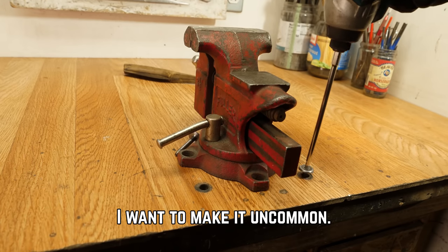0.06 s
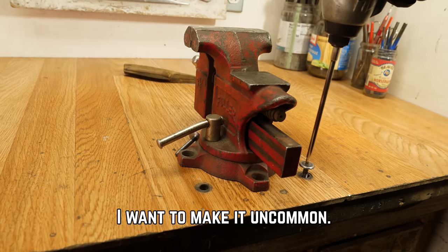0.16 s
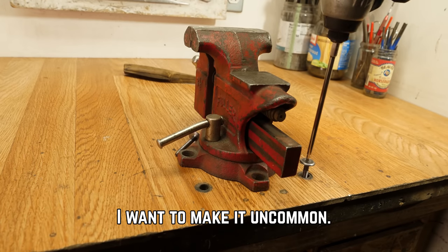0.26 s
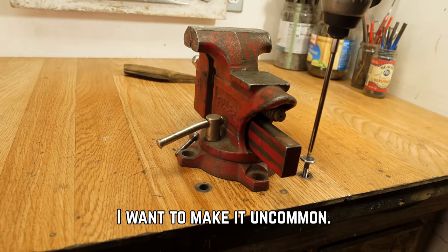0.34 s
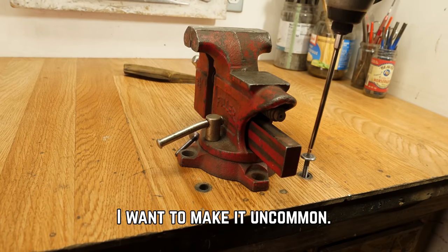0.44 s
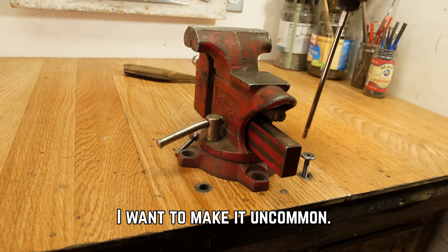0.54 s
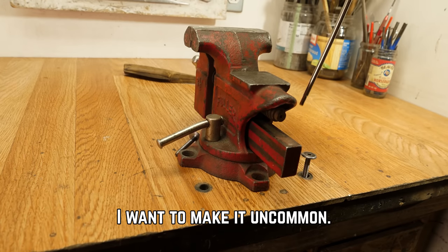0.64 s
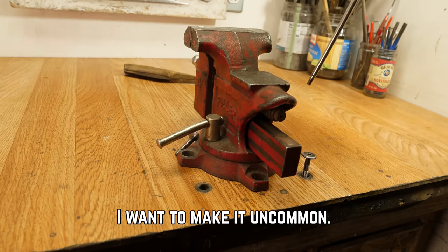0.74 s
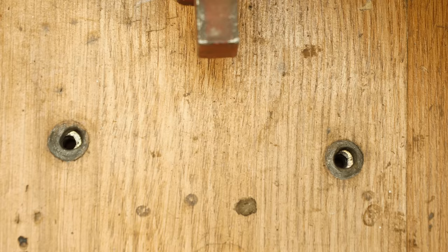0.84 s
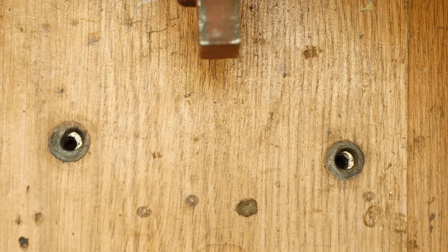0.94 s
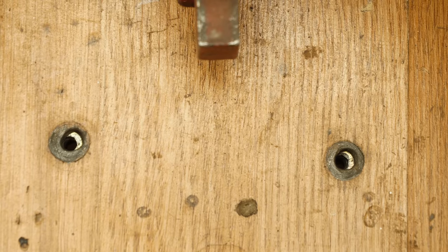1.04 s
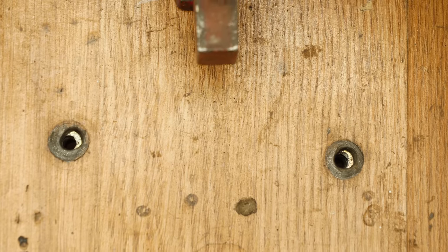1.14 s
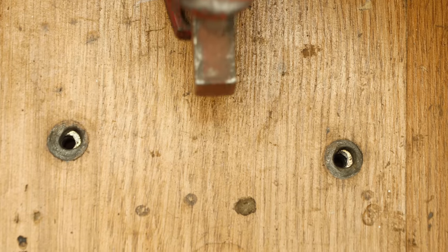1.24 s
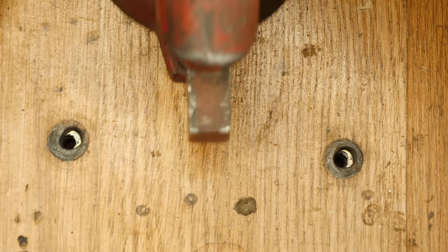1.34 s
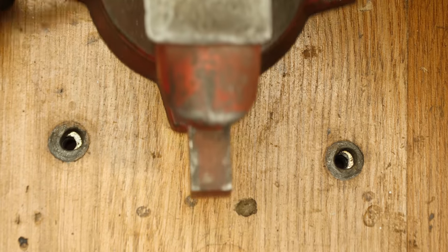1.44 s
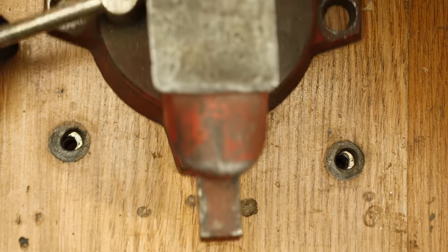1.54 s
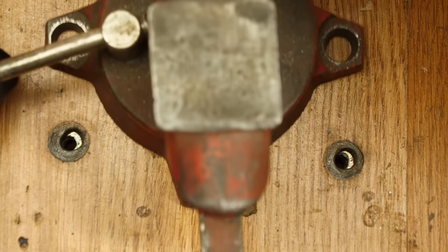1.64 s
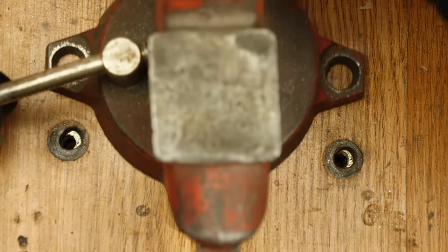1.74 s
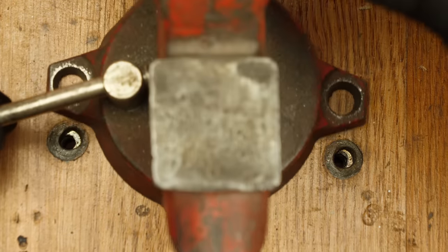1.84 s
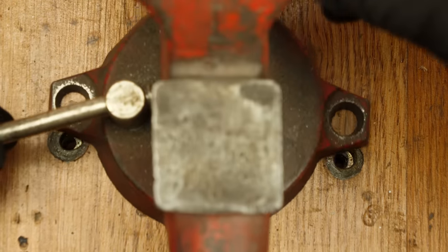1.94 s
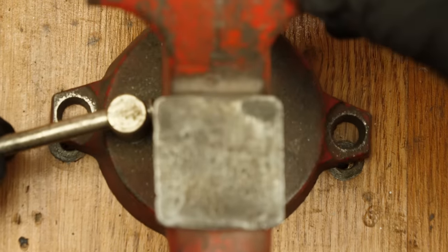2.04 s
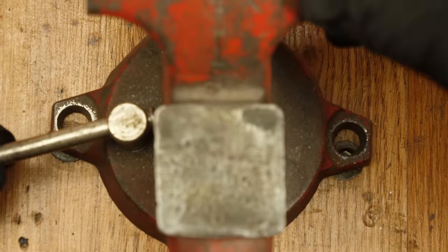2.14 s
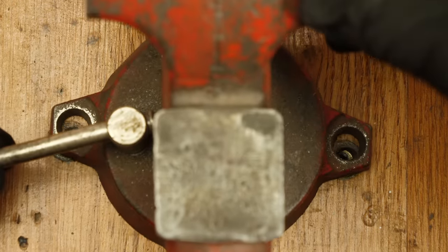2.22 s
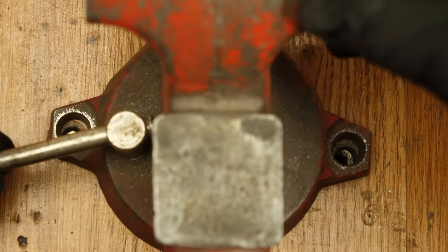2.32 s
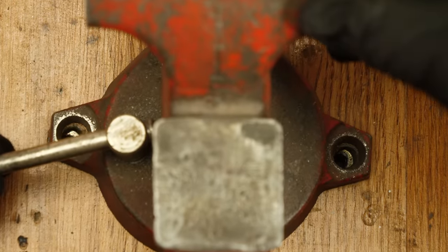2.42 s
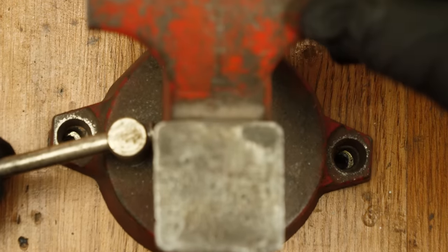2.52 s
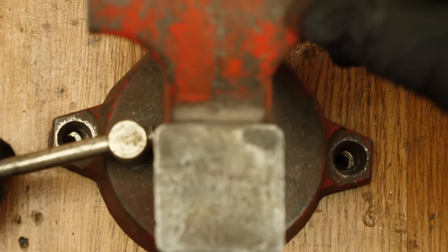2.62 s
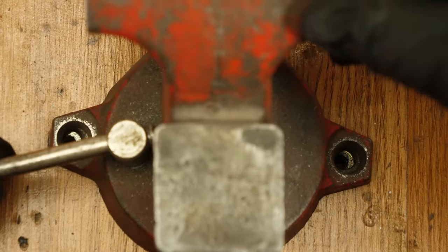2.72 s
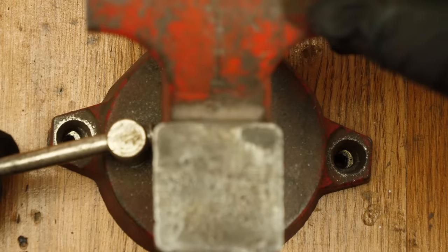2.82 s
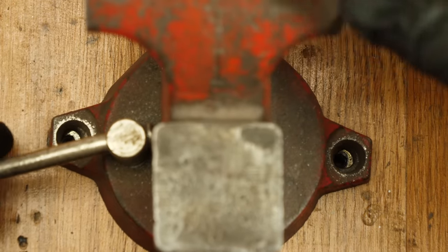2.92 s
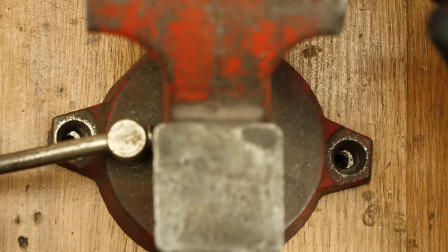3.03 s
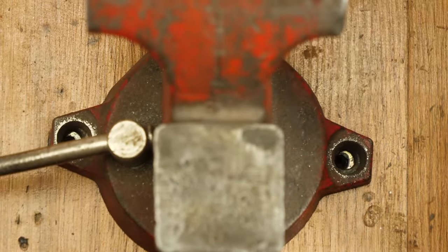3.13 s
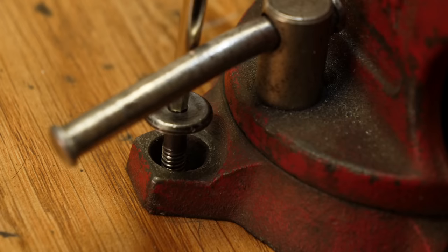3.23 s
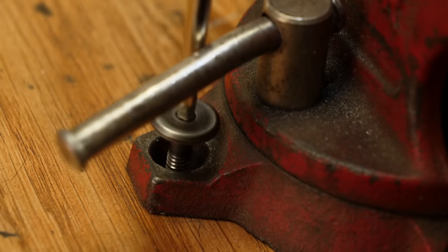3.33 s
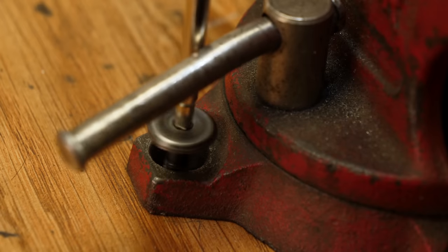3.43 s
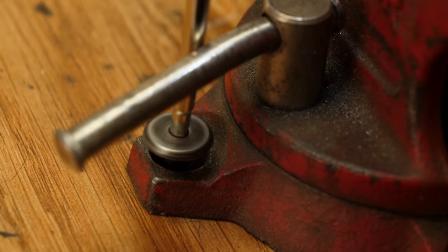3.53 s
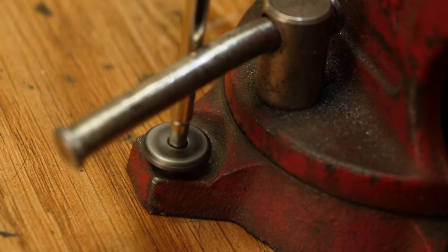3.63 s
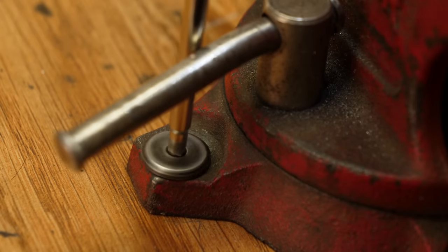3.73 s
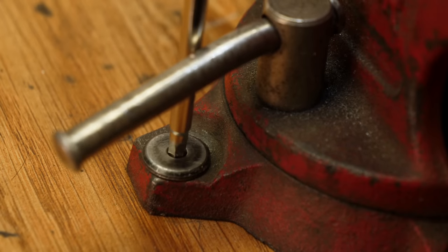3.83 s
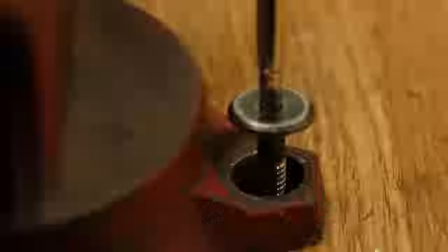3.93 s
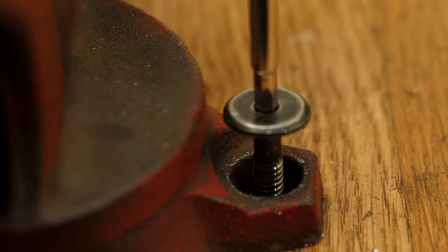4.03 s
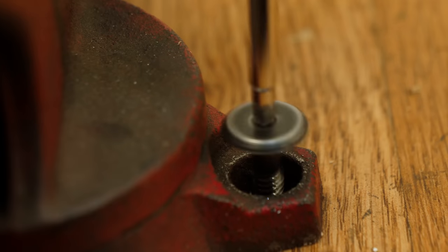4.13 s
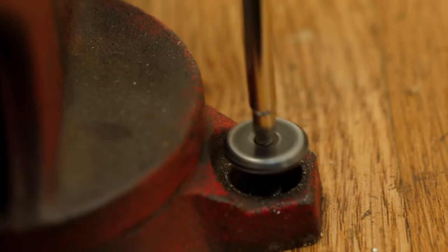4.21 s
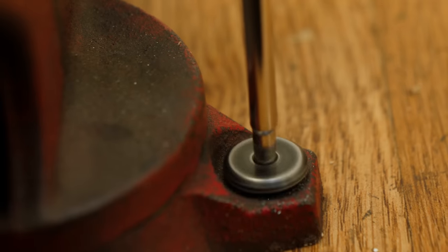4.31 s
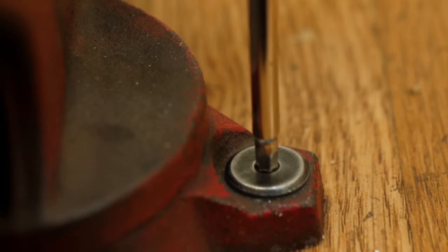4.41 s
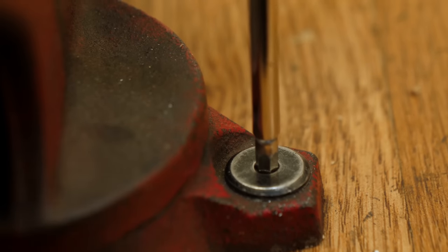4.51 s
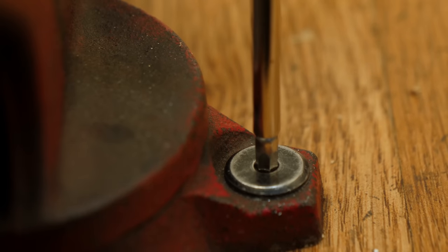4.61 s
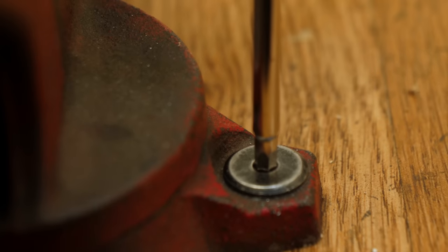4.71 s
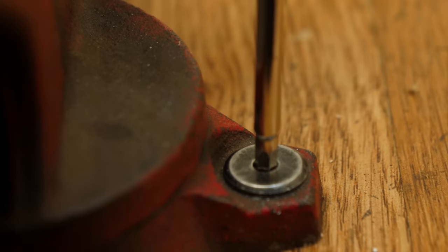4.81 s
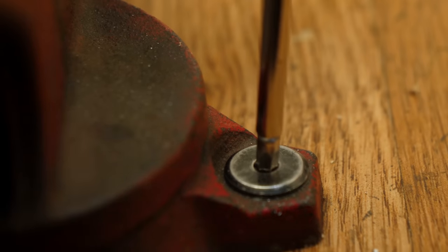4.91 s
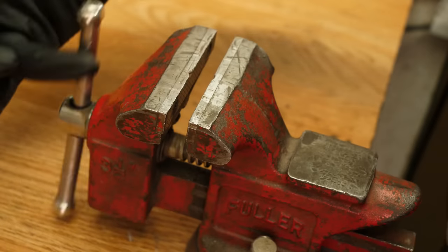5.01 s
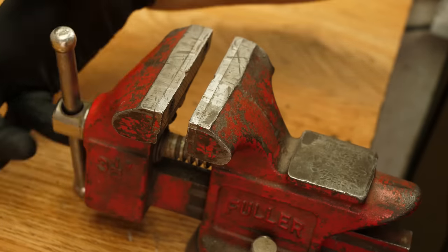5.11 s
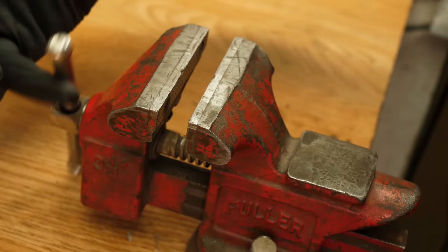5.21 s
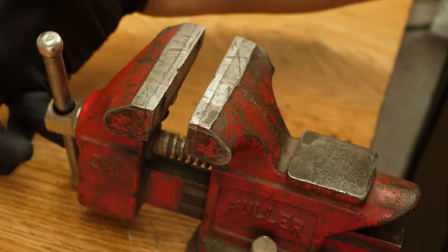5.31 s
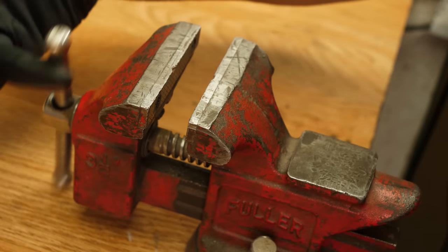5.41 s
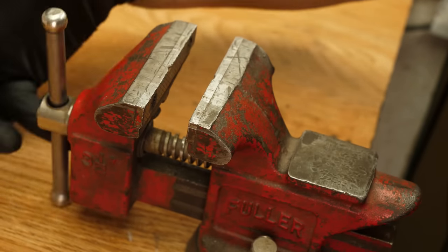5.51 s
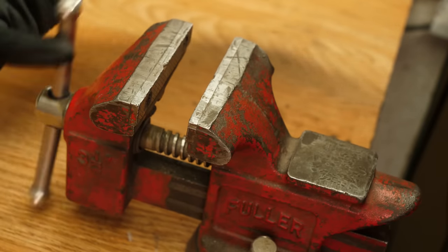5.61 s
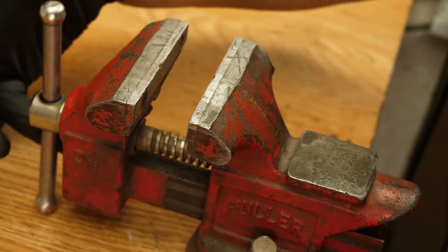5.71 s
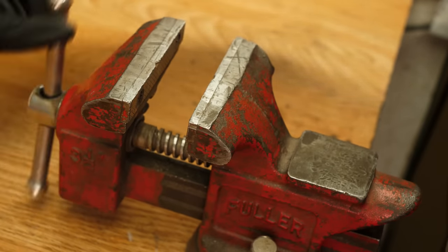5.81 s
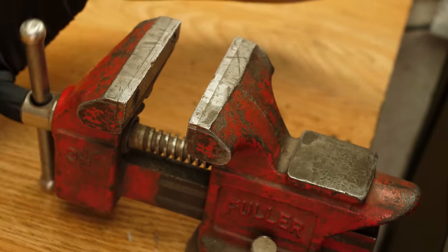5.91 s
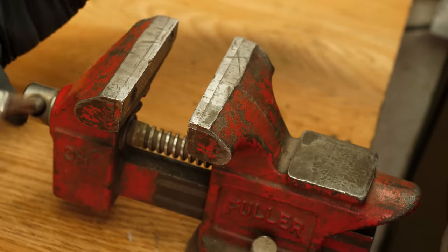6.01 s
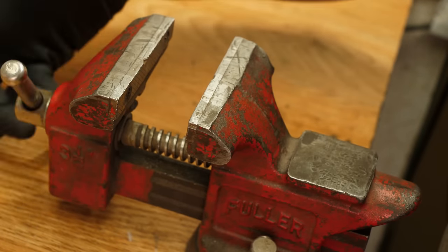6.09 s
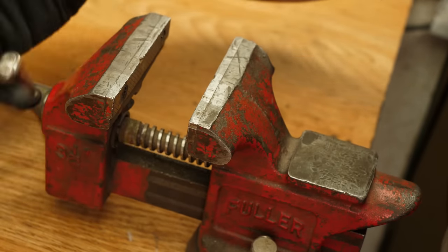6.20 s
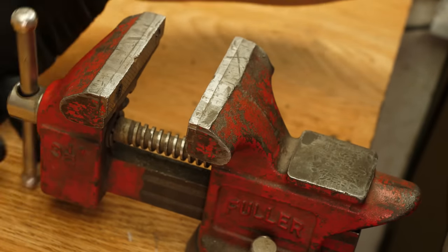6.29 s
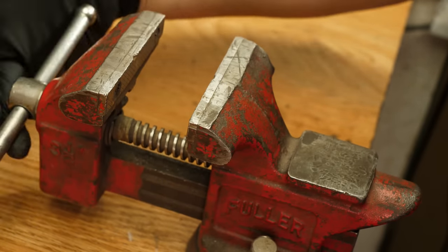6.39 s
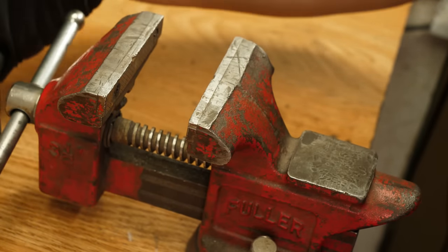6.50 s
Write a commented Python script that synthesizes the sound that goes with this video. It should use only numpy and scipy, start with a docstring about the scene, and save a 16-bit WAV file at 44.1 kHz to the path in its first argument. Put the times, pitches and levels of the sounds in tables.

```python
"""Workbench with an impact driver and a vise

Close by, an impact driver backs a bolt out; a cast-iron vise is dragged over the wooden top and set down.
Two bolts are driven until the hammer chatters, then the vise handle is cranked and clanks in its loose socket.
Rubbing and grinding are rough noise in three bands, hits are noise ringing a set of resonances, and whines
and hums are gliding sines. The actions are set apart by silence; a small room answers the metal hits."""
import sys
import numpy as np
from scipy import signal
from scipy.fft import rfft, irfft, next_fast_len
from scipy.io import wavfile
from scipy.ndimage import uniform_filter1d, map_coordinates

SR = 44100
rng = np.random.default_rng(int(sys.argv[2]) if len(sys.argv) > 2 else 0)


def wav_out(sig):
    """Save sig, one row per channel (or a flat mono array), as 16-bit PCM at SR to the path in sys.argv[1]."""
    wavfile.write(sys.argv[1], SR, np.round(np.clip(np.atleast_2d(sig).T, -1, 1) * 32767).astype(np.int16))


N = 288855
TIME = np.arange(N) / SR  # [s]

# Deep hum, one curve per stretch of action: (time [s], level [dB])
SWAY_CURVES = [
    [(0, -49), (0.42, -65.5), (0.55, -57), (0.8, -93)],
    [(0.97, -63), (1.18, -48), (1.3, -56), (1.7, -42.5), (2.0, -48.5), (2.65, -47), (2.8, -61.5),
     (2.92, -51.5), (3.05, -58), (3.2, -95)],
    [(3.33, -60.5), (3.5, -53.5), (3.88, -45.5), (3.99, -57.5)],
    [(4.1, -71.5), (4.33, -55.5), (4.85, -60), (5.0, -81)],
]
# How long the room rings at each pitch: (frequency [Hz], time to fall 60 dB [s])
ROOM_DECAY = [(200, 0.059), (2000, 0.11), (10000, 0.054)]

# Dull knocks on the bench: (time [s], strength [dB], brightness [dB], nominal time to fall 60 dB [s])
KNOCK_EVENTS = [(0.989, -44.5, -24, .06), (1.092, -36, 0, 0.16), (1.124, -28, -16.5, 0.11),
                (2.285, -40, -22, 0.089), (2.62, -55, -20, .1), (2.856, -40, -32, .11),
                (2.92, -57, -28, 0.11), (2.99, -51, -18.5, .07), (3.012, -36, -12, 0.1),
                (3.358, -37, -7.5, 0.23), (3.417, -25.5, -10.5, .1), (3.677, -33.5, -10.5, 0.094),
                (4.861, -42.5, -0.5, 0.16)]
# Resonances of the bench top: (frequency [Hz], width [Hz], level [dB])
BENCH_TOP_MODES = [(85.6, 21, 0.5), (166, 152, -1.5), (287, 100, 1), (476, 150, -4.5)]
# Resonances of a harder contact with the bench: (frequency [Hz], width [Hz], level [dB])
HARD_EDGE_MODES = [(660, 110, -2), (860, 130, 0), (1200, 300, -12), (1900, 600, -20), (3000, 300, -17)]

# The vise dragged over wood, then settling: (time [s], grind level [dB])
DRAG_CURVES = [
    [(0.972, -68), (1.0, -68), (1.08, -75.5), (1.17, -63.5), (1.23, -46.5), (1.29, -43), (1.42, -39.5),
     (1.48, -38), (1.52, -42), (1.83, -45), (1.9, -48), (2.04, -52.5), (2.11, -60.5), (2.28, -59.5),
     (2.36, -56), (2.44, -62.5), (2.68, -69), (2.74, -85), (2.85, -92)],
    [(2.855, -89), (2.93, -84), (2.99, -86), (3.04, -73), (3.1, -85), (3.232, -106)],
]
# Tone colour of iron on wood: (frequency [Hz], relative level per hertz [dB])
WOOD_COLOUR = [(29, -38), (50, -8), (108, -7.5), (148, 2.5), (277, -3.5), (329, 1), (694, -14), (746, -12),
               (1020, -14), (1150, -10.5), (1620, -16.5), (2210, -22), (5950, -17), (14200, -38),
               (16000, -37)]
# Loose parts that sing faintly along with the drag: (frequency [Hz], width [Hz], level [dB])
RATTLE_MODES = [(3890, 100, -4.5), (5560, 120, 2), (2205, 29, 2)]

# Drops of the small lever: (time [s], strength [dB])
LEVER_DROPS = [(2.9984, -27.5), (3.012, -20)]
# Resonances of the lever: (frequency [Hz], width [Hz], level [dB])
LEVER_MODES = [(1500, 400, -10), (3130, 120, -1), (4170, 250, -2), (4400, 150, -5), (4950, 150, -6),
               (5420, 60, 4), (6800, 300, -7), (7430, 250, -9), (9000, 1800, -14), (12400, 1500, -21)]

# Handle and screw contacts: (time [s], strength [dB], steel over strength [dB], squeal over strength [dB])
CLANK_EVENTS = [(5.038, -67, -6, -23), (5.138, -14.5, -17, -38), (5.168, -36, -10, -0.5),
                (5.184, -36, -17, -31), (5.266, -56, -4.5, -5), (5.28, -40.5, -10, -13),
                (5.309, -43.5, -23, -38), (5.347, -24.5, -19, -46), (5.377, -29.5, -16, -37),
                (5.402, -57, -12, -25), (5.505, -41, -20, -40), (5.548, -26, -19.5, -27),
                (5.579, -46, -16, -39), (5.659, -55, -5, -6), (5.676, -45.5, -6, -1.5),
                (5.731, -16, -14.5, -18.5), (5.758, -33.5, -8.5, -1.5), (5.828, -51, -1.5, -4),
                (5.855, -54, 0, -30), (5.871, -35.5, -7.5, -22), (5.924, -13, -14, -35),
                (5.964, -28.5, -16, -37), (6.002, -42.5, -11, -28), (6.046, -34, -2, 2.5),
                (6.083, -38.5, -27, -37), (6.106, -38.5, -9.5, -1), (6.145, -18.5, -12, -21),
                (6.169, -24.5, -41, -45), (6.19, -25.5, -13.5, -45), (6.344, -20.5, -19.5, -19),
                (6.36, -31.5, -9, -9), (6.384, -50, -16, -37.5), (6.403, -46.5, -12, -13),
                (6.432, -40, -27, -38), (6.521, -40, 3.5, -1)]
# Resonances of the vise body: (frequency [Hz], width [Hz], level [dB])
CASTING_MODES = [(54.6, 38, -15), (152, 33.4, -3), (348.4, 43, 3), (566, 80, -4), (633, 85, -6.5),
                 (770, 146, -10)]
# Resonances of the jaw: (frequency [Hz], width [Hz], level [dB])
JAW_MODES = [(942, 38, 0.5), (1240, 101, 0), (1465, 255, -7.5), (1790, 130, -10), (2005, 120, -11.5)]
# Resonances of the handle bar: (frequency [Hz], width [Hz], level [dB])
HANDLE_BAR_MODES = [(2404, 190, -2), (2840, 220, -3), (3470, 200, -7), (4110, 130, -0.5), (4660, 220, -8.5),
                    (5420, 180, -1.5), (4380, 2900, -11.5), (8900, 3000, -22.5)]
# Resonances of the screw: (frequency [Hz], width [Hz], level [dB])
SCREW_MODES = [(5700, 140, -3), (6545, 130, -0.5)]
# Resonances of the squeal: (frequency [Hz], width [Hz], level [dB])
SQUEAL_MODES = [(10870, 390, 12), (11500, 180, 4), (11400, 330, -14), (14200, 630, -16)]

# Bit ticking in the bolt head, and grit under the vise: (time [s], strength [dB])
TICK_EVENTS = [(0.0164, -36), (0.3069, -15), (0.3178, -27), (0.3835, -19), (0.3972, -20.5), (0.4744, -27.5),
               (0.512, -24), (0.5472, -29.5), (0.6058, -34), (0.637, -19.5), (0.6622, -27), (1.862, -38),
               (1.8863, -22.5), (1.9027, -29), (2.1845, -30.5), (2.337, -51), (2.351, -33), (2.3798, -37),
               (2.441, -38.5), (2.5202, -41.5), (2.5835, -47), (2.7107, -49.5), (3.3275, -21),
               (3.3476, -31), (3.3583, -18), (3.6947, -27), (3.7962, -20.5), (3.8068, -20.5), (4.1027, -20),
               (4.1231, -21), (4.1771, -15.5), (4.1877, -14), (4.216, -17), (4.6603, -19.5), (4.6825, -15),
               (4.7823, -41.5), (4.8198, -45), (4.8605, -28.5), (4.8782, -39.5)]
# Resonances of the thin bit: (frequency [Hz], width [Hz], level [dB])
BIT_MODES = [(4420, 1000, 5.5), (6100, 2500, 2.5), (8900, 730, -2), (13100, 1500, -9)]
# Resonances of the bolt head: (frequency [Hz], width [Hz], level [dB])
BOLT_HEAD_MODES = [(1200, 350, -6.5), (2850, 1200, -3.5)]
# Hammer blows on the anvil: (time [s], strength [dB])
HAMMER_BLOWS = [(3.856, -14.5), (3.866, -12.5), (3.875, -8.5), (3.884, -9), (3.892, -15.5), (4.453, -7.5),
                (4.473, -3), (4.493, -2.5), (4.51, -3), (4.523, -5.5), (4.535, -6.5), (4.543, -8),
                (4.554, -7.5), (4.565, -5.5), (4.576, -6), (4.588, -4), (4.599, -12.5), (4.611, -7),
                (4.617, -2.5), (4.633, -17)]
# Resonances of the anvil: (frequency [Hz], width [Hz], level [dB])
ANVIL_MODES = [(742, 20, 2.5), (1095, 16, 4.5), (1330, 23, 4), (2460, 35, -11.5), (3090, 17, -10),
               (3470, 58, -8.5), (3990, 46, -4), (4530, 170, -6.5), (5550, 180, -8), (5980, 130, -7),
               (7030, 160, -3.5), (7800, 76, -8), (8310, 30, -16.5), (8950, 37, -22)]
# Broad resonances of the hammer's clatter: (frequency [Hz], width [Hz], level [dB])
CLATTER_MODES = [(75.3, 37, -8.5), (513, 350, -5.5), (844, 410, -1), (2450, 5370, -4.5), (5500, 7400, -4.5),
                 (10950, 8700, -15.5)]

# The driver's three runs, the last two split before and after their hammering:
# (time [s], gear level [dB], bench drone level [dB])
DRIVER_RUNS = [
    [(0, -41, -37), (0.04, -47, -44.5), (0.2, -49, -48), (0.42, -50, -54.5), (0.53, -55.5, -69),
     (0.61, -64, -79), (0.66, -56.5, -71), (0.69, -82.5, -78), (0.79, -104, -99)],
    [(3.327, -58, -63), (3.345, -50.5, -65), (3.39, -43, -37), (3.46, -49, -49), (3.76, -46, -48.5),
     (3.825, -48, -46), (3.85, -38, -42.5), (3.87, -36, -29)],
    [(3.9, -44, -32), (3.94, -48, -50), (3.985, -67, -59)],
    [(4.1, -51.5, -64.5), (4.14, -49, -51), (4.24, -44, -40), (4.42, -45, -43.5), (4.44, -37.5, -42.5),
     (4.455, -36, -49)],
    [(4.63, -23.5, -40), (4.705, -40.5, -56.5), (4.75, -59.5, -72), (4.85, -77.5, -66), (4.9, -68, -61),
     (5.02, -104.5, -89.5)],
]
# Fan hiss over the gears, one value per part of the runs: (level [dB])
FAN_HISS = (4, 0.5, -2, 4.5, -3.5)
# Tone colour while the bolt comes out: (frequency [Hz], relative level per hertz [dB])
OUT_COLOUR = [(29, -32.5), (50, 19), (116, 1), (559, -1.5), (1150, -2.5), (1330, 0.5), (2210, -10),
              (2950, -3), (4900, -1), (13200, -13.5), (16000, -23.5)]
# Tone colour of the first bolt going in: (frequency [Hz], relative level per hertz [dB])
FIRST_COLOUR = [(29, -37), (50, -14), (101, -1.5), (128, 8.5), (203, 2), (329, -18.5), (483, -9.5),
                (711, -19), (1020, -3.5), (1360, -12.5), (2270, -17), (2810, -13), (3580, -10.5),
                (7040, -11), (16000, -33)]
# Tone colour of the second bolt going in: (frequency [Hz], relative level per hertz [dB])
SECOND_COLOUR = [(29, -35), (50, 0.5), (155, -0.5), (428, -12.5), (646, -4), (1910, -13.5), (3250, -12),
                 (3760, -12.5), (5020, -9.5), (16000, -30.5)]
# Gear whine while the bolt comes out: (time [s], tooth rate [Hz], level [dB])
OUT_WHINE = [(0, 1385, -50), (.07, 1492, -49.5), (.13, 1550, -48), (.18, 1560, -48), (.24, 1480, -50),
             (.3, 1330, -52), (.375, 1180, -57)]
# Gear whine coasting down: (time [s], tooth rate [Hz], level [dB])
COAST_WHINE = [(.46, 1690, -65), (.54, 1665, -61), (.6, 1590, -58), (.635, 1510, -62)]
# Gear whine of the second bolt going in: (time [s], tooth rate [Hz], level [dB])
IN_WHINE = [(4.22, 1590, -40), (4.29, 1637, -42), (4.44, 1686, -44.5)]
# Gear whine as the gears take up the load: (time [s], tooth rate [Hz], level [dB])
BITE_WHINE = [(4.156, 1310, -49), (4.17, 1266, -38), (4.19, 1400, -60)]
# Lines of the four whines, in the order above: (multiple of tooth rate [1], level [dB])
TOOTH_LINES = [
    [(1, -12.5), (2, -1.5), (3, 0.5), (5, -4)],
    [(2, -20), (3, 2.5)],
    [(1, -12.5), (2, -12.5), (3, -4)],
    [(1, -4.5), (2, -0.5)],
]
# The bolt hums in the bench: (time [s], base rate [Hz], level [dB])
BOLT_DRONE = [(0.1, 143.4, -47.5), (0.2, 172.2, -50.5), (0.262, 190.2, -44.5), (0.42, 152.6, -42.5),
              (0.54, 170.6, -74)]
# Motor hum of the first bolt: (time [s], base rate [Hz], level [dB])
MOTOR_HUM = [(3.46, 189.4, -60), (3.512, 204.2, -50), (3.68, 209.4, -48), (3.73, 204, -59),
             (3.84, 193, -59)]


def amp(db):
    """Turn decibels into a plain gain."""
    return 10 ** (np.asarray(db) / 20)


def unit(x):
    """Scale a sound to an rms of 1."""
    return x / np.sqrt(np.mean(x ** 2) + 1e-20)


def span(rows):
    """The samples that a curve covers."""
    return slice(round(rows[0][0] * SR), round(rows[-1][0] * SR))


def along(points, hz):
    """Read (frequency, value) points along a logarithmic frequency axis."""
    f, value = np.transpose(points)
    return np.interp(np.log(hz + 1), np.log(f + 1), value)


def gains(rows, column):
    """Gain per sample from a dB column, over the table's own span."""
    rows = np.array(rows)
    return amp(np.interp(TIME[span(rows)], rows[:, 0], rows[:, column]))


def wobble(rate, size):
    """A smooth random curve with `rate` knots a second."""
    knots = rng.standard_normal(int(size * rate / SR) + 9)
    return map_coordinates(knots, [np.arange(size) * rate / SR])


def filtered(x, response):
    """Shape a sound by a complex response of frequency."""
    padded = next_fast_len(len(x) + 8192)
    return irfft(rfft(x, padded) * response(np.fft.rfftfreq(padded, 1 / SR)), padded)[:len(x)]


def modes(table):
    """The response of a set of resonances that ring only after the strike."""
    def response(f):
        total = 0
        for k, (centre, width, db) in enumerate(table):
            peak = 1j * f * width / (centre * centre - f * f + 1j * f * width)
            total = total + (-1) ** k * amp(db) * peak  # neighbours have opposite signs
        return total
    return response


def grit(depth_db, size):
    """White noise whose strength jumps about: rough contact."""
    return unit(rng.standard_normal(size) * amp(depth_db * wobble(700, size)))


def three_bands(source, colour, edges_hz):
    """Split a coloured source into middle, low and high parts, each with an rms of 1."""
    def below(f, edge):
        return 1 / np.sqrt(1 + (f / edge) ** 8)

    def above(f, edge):
        return np.sqrt(1 - below(f, edge) ** 2)

    low_edge, high_edge = edges_hz
    parts = [lambda f: above(f, low_edge) * below(f, high_edge),
             lambda f: below(f, low_edge),
             lambda f: above(f, high_edge)]
    return [unit(filtered(source, lambda f: amp(along(colour, f)) * part(f))) for part in parts]


def rubbing(rows, colour, edges_hz, grit_db, flutter_db):
    """Rough noise in three bands, each on its own level curve, fluttering together."""
    out = np.zeros(N)
    size = len(out[span(rows)])
    bands = three_bands(grit(grit_db, size), colour, edges_hz)
    fade_in = np.clip(np.arange(size) / (.004 * SR), 0, 1)  # 4 ms
    flutter = amp(flutter_db * wobble(28, size))
    mix = sum(gains(rows, k + 1) * band for k, band in enumerate(bands))
    out[span(rows)] = fade_in * flutter * mix
    return out


def tone(rows, orders, waver_db):
    """Sines on multiples of a gliding rate, each wavering in level."""
    out = np.zeros(N)
    t = TIME[span(rows)]
    rate = np.interp(t, *np.transpose(rows)[:2])
    turns = np.cumsum(rate * (1 + .0075 * wobble(200, len(t)))) / SR
    lines = 0
    for multiple, db in orders:
        level = amp(db + waver_db * wobble(169.5, len(t)))
        lines = lines + level * np.sin(2 * np.pi * multiple * turns)
    out[span(rows)] = np.sqrt(2) * gains(rows, column=2) * lines
    return out


def contacts(s, db, rise, t60, body, scatter_db, snap_db=-99):
    """Short rattling contacts: noise in the body's modes, struck anew each time, optionally with a sharp snap."""
    size, lead = 8192, 512  # samples in one contact, and those kept before its start
    out = np.zeros(N + SR)
    t, hz = (np.arange(size) - lead) / SR, np.fft.rfftfreq(size, 1 / SR)
    for start, level_db, rise_s, t60_s in np.broadcast(s, db, np.abs(rise) + 1e-4, np.abs(t60) + 1e-3):
        struck = [(centre * (1 + 0.02 * rng.standard_normal()), width, level + scatter_db * rng.standard_normal())
                  for centre, width, level in body]
        response = modes(struck)(hz)
        ring = unit(irfft(rfft(grit(2.2, size)) * response))
        snap = np.roll(irfft(response), lead) * (t >= 0) * amp(-60 * t / .04)
        # bell-shaped rise, rounded top, exponential fall
        late = np.hypot(t - rise_s, rise_s) - rise_s
        shape_db = np.where(t < rise_s, -14 * (1 - t / rise_s) ** 2, -60 * late / t60_s)
        hit = amp(level_db + shape_db) * ring
        hit = hit + amp(level_db + snap_db) * snap / np.abs(snap).max()
        out[round(start * SR):][:size] += hit
    return out[lead:][:N]


def sway():
    """A deep unsteady hum, a steady sine plus narrow noise, comes and goes with the action."""
    level = np.zeros(N)
    for rows in SWAY_CURVES:
        level[span(rows)] = gains(rows, column=1)
    steady = np.sqrt(2) * np.sin(2 * np.pi * 22.8 * TIME)
    loose = unit(filtered(rng.standard_normal(N), modes([(32, 9.5, 0)])))
    return uniform_filter1d(level, size=800) * (steady + 0.5 * loose)


def room(x):
    """The room answers with a noise tail in which each frequency dies at its own speed."""
    hz, t, noise = signal.stft(rng.standard_normal(SR // 3), SR, nperseg=256)
    decay = amp(-60 * t / along(ROOM_DECAY, hz)[:, None])
    tail = signal.istft(noise * decay, SR, nperseg=256)[1]
    delayed = np.pad(x, (200, 0))  # samples
    return signal.fftconvolve(delayed, tail / np.linalg.norm(tail))[:N]


def knocks():
    """Soft blows ring the bench top; a brighter part adds the harder contact."""
    s, db, bright_db, t60 = np.transpose(KNOCK_EVENTS)
    dull = contacts(s, db - 7, .005, t60, BENCH_TOP_MODES, scatter_db=2)
    bright = contacts(s, db + bright_db + 1.5, 0.002, 0.63 * t60, HARD_EDGE_MODES, scatter_db=0.74, snap_db=-5)
    return dull + bright


def drag():
    """Iron feet rub the grain of the wood; the pressure flutters and loose parts sing along."""
    rumble_over_grind_db, rasp_over_grind_db = (3.5, 4.5), (0.5, 20.5)  # at a -50 dB grind: drag, settling
    rumble_grows, rasp_grows = 0.88, 1.164  # dB per dB of grind: a harder drag is brighter
    rub = 0
    for curve, rumble_db, rasp_db in zip(DRAG_CURVES, rumble_over_grind_db, rasp_over_grind_db):
        rows = [(s, db,
                 rumble_db - 50 + rumble_grows * (db + 50),
                 rasp_db - 50 + rasp_grows * (db + 50)) for s, db in curve]
        rub = rub + rubbing(rows, WOOD_COLOUR, (500, 2500), grit_db=1.25, flutter_db=1.34)
    return rub + amp(3.5) * filtered(rub, modes(RATTLE_MODES))


def lever():
    """The small steel lever drops and clinks in its own resonances."""
    s, db = np.transpose(LEVER_DROPS)
    return contacts(s, db - 10.5, .0012, .045, LEVER_MODES, scatter_db=1, snap_db=-4)


def handle():
    """Loose contacts rattle for some ms and shake body, jaw, handle, screw and bench, each by its own share."""
    s, db, steel_db, squeal_db = np.transpose(CLANK_EVENTS)
    # jaw and screw ring more when the steel does
    parts = [(db - 9, CASTING_MODES),
             (db - 5 + 0.45 * steel_db, JAW_MODES),
             (db + steel_db - 5.5, HANDLE_BAR_MODES),
             (db - 2.5 + 1.63 * steel_db, SCREW_MODES),
             (db + squeal_db - 8.0, SQUEAL_MODES)]
    rise = 0.0076 * amp(-0.043 * (db + 30))  # seconds; a stronger contact rises faster
    metal = sum(contacts(s, level, rise, .047, body, scatter_db=3.5) for level, body in parts)
    thud = contacts(s, db - 18.5, rise, 0.095, BENCH_TOP_MODES, scatter_db=3.5)
    return metal + thud


def ticks():
    """A sharp crack rings the thin bit; a lower part rings the bolt head."""
    turn_from_s, turn_s, turn_db, turns = 3.4745, .0442, -29, 7  # the first bolt spins: one tick each turn
    spinning = [(turn_from_s + k * turn_s, turn_db) for k in range(turns)]
    s, db = np.transpose(TICK_EVENTS + spinning)
    t60 = 0.023 * amp(1.2 * rng.standard_normal(len(s)))
    high = contacts(s, db - 13, 0.00026, t60, BIT_MODES, scatter_db=4, snap_db=11.5)
    low_db = -30 - 18 + 0.97 * (db + 30)  # grows slower than the crack
    return high + contacts(s, low_db, .001, 1.5 * t60, BOLT_HEAD_MODES, scatter_db=3, snap_db=4)


def hammer():
    """Each blow is a broad clatter that also rings the anvil."""
    s, db = np.transpose(HAMMER_BLOWS)
    t60_s = .042
    clatter = contacts(s, db - 11.0, 0.001, t60_s, CLATTER_MODES, scatter_db=1.0, snap_db=9.5)
    return clatter + contacts(s, db - 14, 0.00072, 0.8 * t60_s, ANVIL_MODES, scatter_db=7.5)


def driver():
    """Gears grind, the bench drones, the fan hisses; the gear teeth whine over them."""
    out = tone(BOLT_DRONE, [(0.98, -2)], waver_db=5.5)
    out += tone(MOTOR_HUM, [(1, -2.5), (5, -4.5), (19, -14.0)], waver_db=3.5)
    colours = (OUT_COLOUR, FIRST_COLOUR, FIRST_COLOUR, SECOND_COLOUR, SECOND_COLOUR)
    for run, hiss_db, colour in zip(DRIVER_RUNS, FAN_HISS, colours):
        rows = [(s, gear_db, drone_db, gear_db + hiss_db) for s, gear_db, drone_db in run]
        out += rubbing(rows, colour, (400, 2500), grit_db=2, flutter_db=1.95)
    for rows, lines in zip((OUT_WHINE, COAST_WHINE, IN_WHINE, BITE_WHINE), TOOTH_LINES):
        out += tone(rows, lines, waver_db=4.5)
    return out


def scene():
    """Mix all the sources; the room answers the ticks, hammer, lever and handle."""
    hits = ticks() + hammer() + lever()
    wet = amp(-8.0) * room(hits)
    handle_sound = handle()
    wet = wet + amp(-21.5) * room(handle_sound)
    # the room's answer is cut to silence between the two bolts
    first_bolt_ends, second_bolt_starts = DRIVER_RUNS[2][-1][0], DRIVER_RUNS[3][0][0]
    wet[round(first_bolt_ends * SR):round(second_bolt_starts * SR)] = 0
    return (hits + wet + handle_sound + driver() + drag() + knocks() + sway())[None]


def record(dry):
    """The input stage rounds off the highest peaks; a steep filter removes what lies above the band limit."""
    band_limit_hz = 15900
    rounded = dry[0] / (1 + np.abs(dry[0] / .62) ** 4) ** (1 / 4)
    return filtered(rounded, lambda hz: .5 - .5 * np.tanh((hz - band_limit_hz) / 120))[None]


dry = scene()
out = record(dry)
wav_out(out)
```